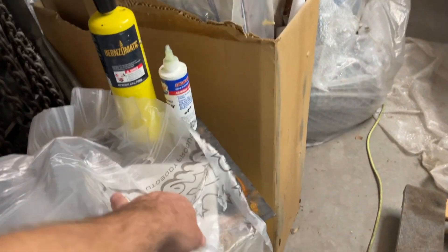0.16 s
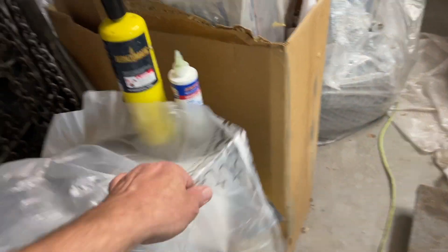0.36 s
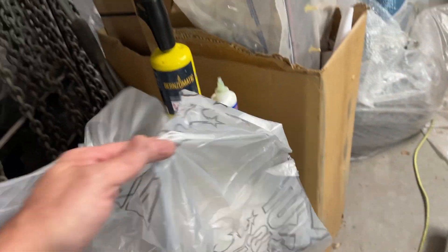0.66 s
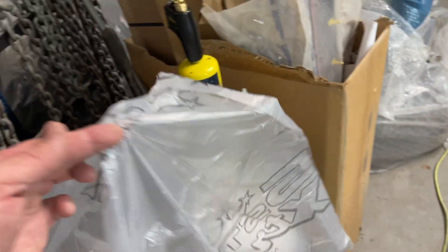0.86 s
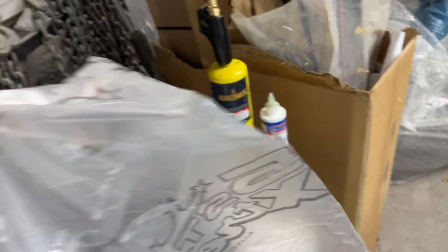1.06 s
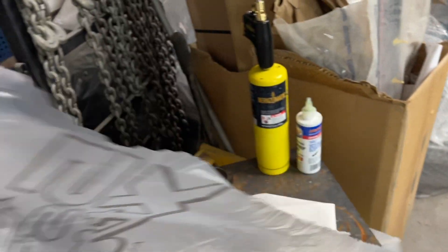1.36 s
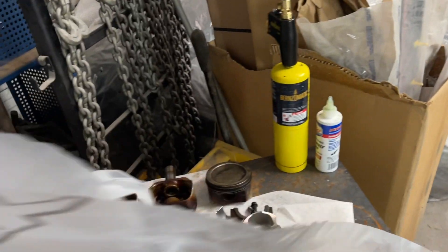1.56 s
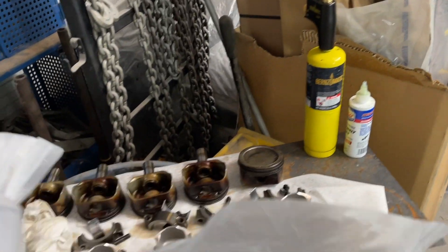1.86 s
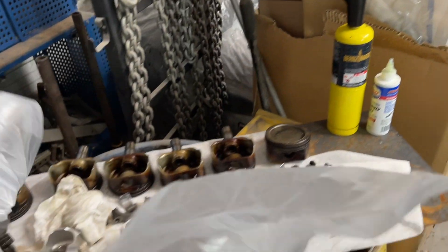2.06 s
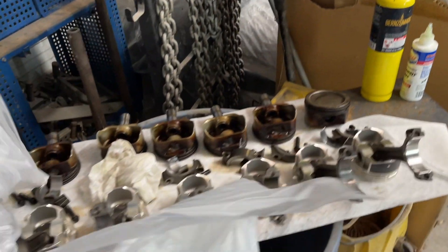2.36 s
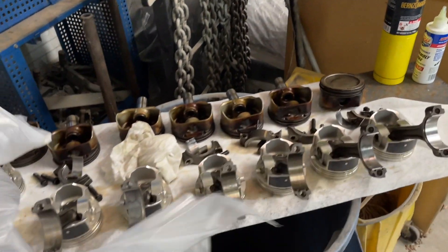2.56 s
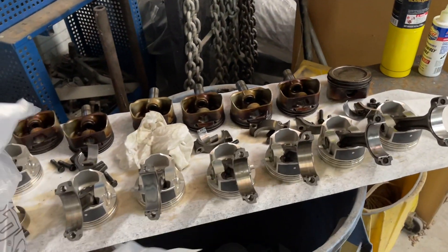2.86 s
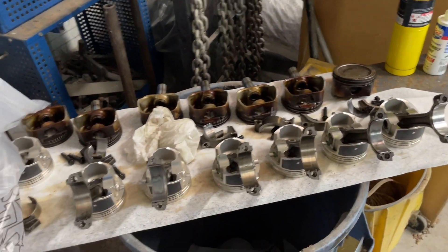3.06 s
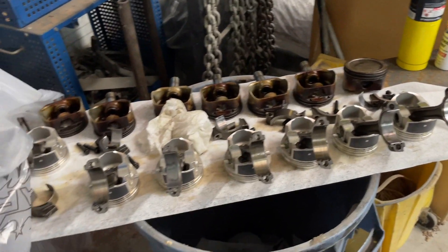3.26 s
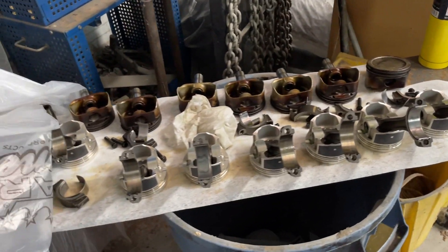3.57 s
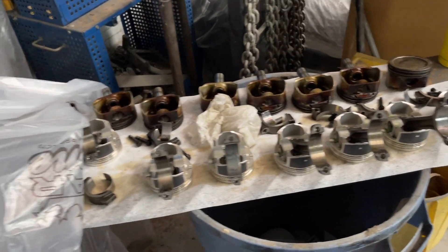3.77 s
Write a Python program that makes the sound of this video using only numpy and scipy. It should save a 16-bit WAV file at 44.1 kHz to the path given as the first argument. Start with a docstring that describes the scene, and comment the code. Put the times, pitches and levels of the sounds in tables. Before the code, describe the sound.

Thin plastic sheeting is dragged off a bench close to a phone microphone in a garage, crinkling brightly with sharp snaps; it thins out and a single hollow tap follows, over a faint distant idling engine.

```python
"""An engine idles some way off, a throbbing set of shaft orders over a low drone; then, close to a phone
in a garage, hands drag a thin plastic sheet off a bench. Countless tiny creases, random clicks, make a bright
hiss over a duller rustle. Big creases crack as short noise bursts with ringing facets, folds flop as
brief decaying notes, and near the end something taps a hollow panel whose modes ring.
The walls answer the cracks, flops and tap; two ports hear it all with some likeness, lead and tilt."""
import sys
import numpy as np
from scipy import signal
from scipy.fft import rfft, irfft, next_fast_len
from scipy.io import wavfile
from scipy.ndimage import uniform_filter1d, map_coordinates

SR = 44100
rng = np.random.default_rng(int(sys.argv[2]) if len(sys.argv) > 2 else 0)


def generate_wav(signal):
    """Clip the signal to [-1, 1] and save it as 16-bit WAV at the path in sys.argv[1]."""
    frames = np.transpose(np.atleast_2d(signal))
    scaled = np.clip(frames, -1, 1) * 32767
    pcm = np.round(scaled).astype(np.int16)
    wavfile.write(sys.argv[1], SR, pcm)


N = 171990

# Distant engine: (multiple of shaft rate, relative level [dB], phase scatter [cycles])
ENGINE_ORDERS = [(3, -55, 0.42), (4, -48.5, 0.47), (6, -59.5, 0.55), (8, -63.5, 0.09), (9, -53, 0.013),
                 (10, -53, .03), (11, -52, 0.024), (12, -61, 0.059), (13, -58.5, 0.28), (15, -57, 0.45)]
# Colour of the engine's low drone: (frequency [Hz], relative level [dB])
DRONE_COLOUR = [(13, -30), (22, -14), (48, 1), (91, 4), (138, 3), (216, -10.5), (251, -10), (413, -19.5),
                (468, -10.5), (600, -22.5), (780, -41), (1320, -120)]
# Pull on the sheet: (time [s], relative crackle level [dB],
# middle band over that [dB, relative], low band over that [dB, relative])
PULL = [(0.0, -87, 12, 6), (0.06, -83, 2, 1), (0.1, -49, -9, -3), (0.16, -44, -6, -6),
        (0.24, -49.5, -6.5, -8), (0.38, -35, -9.5, -9.5), (0.48, -34.5, -8.5, -11.5), (0.56, -31.5, -9, -8),
        (0.61, -35.5, -7, -10), (0.67, -30.5, -12, -11), (0.76, -38, -7, -10.5), (0.92, -36, -9.5, -10.5),
        (1.0, -41.5, -5.5, -7), (1.26, -38.5, -9, -12), (1.29, -42.5, -5.5, -9), (1.32, -40.5, -8.5, -11.5),
        (1.49, -36, -8, -8), (1.51, -34.5, -11, -8.5), (1.53, -35, -7.5, -8), (1.73, -42, -6.5, -7.5),
        (2.07, -37, -8, -8), (2.12, -42, -6, -10), (2.36, -42, -3.5, -10), (2.39, -37, -4.5, -11),
        (2.49, -38.5, -5, -12), (2.56, -41, -5.5, -6.5), (2.606, -43.5, -6.5, -11.5), (2.616, -38, -2, -10),
        (2.645, -40.5, -4, -5), (2.655, -40, -7, -10), (2.69, -45, 0, -10), (2.71, -38, -3, -8.5),
        (2.75, -42, -1.5, -3), (2.81, -44, -5, -8.5), (3.02, -45, -4.5, -10), (3.51, -41.5, -6, -11.5),
        (3.57, -42.5, -4, -6), (3.66, -46, -5.5, -12.5), (3.78, -47, -6, -8), (3.9, -46.5, -8, -9)]
# Wide folds moving: (time [s], relative level of the dull rustle [dB])
FOLDING = [(0.0, -64), (0.13, -60.5), (0.27, -60.5), (0.39, -49.5), (0.52, -44), (0.62, -48), (0.88, -53),
           (1.17, -57), (1.36, -55), (1.42, -54), (1.57, -49.5), (1.75, -56.5), (2.05, -56), (2.38, -56),
           (2.58, -54.5), (2.75, -52.5), (2.93, -59), (3.5, -59.5), (3.74, -62), (3.9, -66)]
# Colour of the creases' crackle: (frequency [Hz], relative level [dB])
CRACKLE_COLOUR = [(600, -19.5), (1500, -15.5), (2500, -14), (3100, -14), (3900, -12.5), (5500, -11),
                  (7200, -9.5), (9500, -4), (10800, -1), (11800, -7), (12700, -16.5), (14500, -25),
                  (16000, -47)]
# Colour of the wide folds' rustle: (frequency [Hz], relative level [dB])
RUSTLE_COLOUR = [(100, -46), (220, -5), (350, 0), (600, -3), (950, -2.5), (1400, -13), (2500, -13),
                 (5000, -35)]
# Edges between the crackle's three bands, upper then lower: (frequency [Hz])
BAND_EDGES = [6500, 3400]
# Big creases: (time [s], relative level [dB], spray against that level [dB],
# facet pitch [Hz], facet against that level [dB])
SNAPS = [(0.0918, -31, -12, 5000, -2), (0.1358, -28, -16, 5060, 4), (0.5484, -28, -14, 5000, -9),
         (0.66, -17, -14, 4500, -12), (1.1722, -29, -14, 5000, -9), (1.205, -26, -18, 5000, -11),
         (1.5053, -10.5, -8, 3220, -7.5), (1.513, -27, -10, 7500, -9), (1.518, -19, -10, 7500, -9),
         (2.611, -15, -10, 5250, -3), (2.619, -29, -12, 4530, -4), (2.6292, -20, -9, 5500, -4),
         (2.642, -25, -14, 5500, 1), (2.6974, -37, -16, 5000, -6), (2.7055, -15.5, -16, 5500, -5),
         (2.7105, -24, -17, 5500, -6), (2.7168, -18.5, -16, 5500, 3), (2.7302, -26, -13, 5100, 11),
         (3.78, -29, -11, 3820, 4)]
# Folds popping over: (time [s], relative level [dB], pitch [Hz])
FLOPS = [(0.347, -26, 1090), (0.37, -24, 970), (0.612, -24, 980), (0.73, -38, 420), (0.926, -26, 940),
         (1.087, -34, 945), (1.425, -36.5, 315), (1.502, -29, 790), (1.517, -36, 950), (1.585, -39, 600),
         (1.62, -34, 343), (1.645, -36, 342), (1.859, -34, 450), (2.148, -34.5, 230), (2.184, -36.5, 240),
         (2.206, -43, 277), (2.559, -36.5, 202), (2.562, -36, 700), (2.64, -24, 1880), (2.704, -44, 256),
         (2.721, -32, 244)]
# Hard first contact of the tap: (frequency [Hz], level against the thump [dB], t60 [s])
KNOCK_MODES = [(900, -5, .014), (1900, -18, .008), (2700, -24, .006)]
# Modes of the hollow panel: (frequency [Hz], level against the thump [dB], t60 [s])
PANEL_MODES = [(102.5, -17, 0.28), (159.6, -14.5, 0.26), (221, -23, 0.25), (290, -33, .2), (356, -23, 0.22),
               (410, -26, 0.18), (452.5, -19.5, 0.14), (602, -28, 0.1), (704, -21, .07), (845, -22, 0.076),
               (1220, -25.5, 0.08)]
# Decay of the garage: (frequency [Hz], t60 [s])
GARAGE_DECAY = [(200, 0.19), (2000, 0.066), (10000, 0.12)]
# Likeness of the two ports: (frequency [Hz], left-right likeness [0 to 1])
PORT_LIKENESS = [(30, .98), (60, .96), (130, .86), (300, .8), (900, .75), (1600, .1), (2200, .62),
                 (3500, .35), (4300, .5), (5000, .25), (6200, .62), (7000, .35), (8400, .99), (9200, .82),
                 (10000, .995), (10600, .995), (11400, .84), (12000, .99), (12900, .9), (13300, .999)]
# Phase by which the right port leads: (frequency [Hz], lead [rad])
PORT_LEAD = [(100, 0), (400, -.4), (1300, -.8), (2200, -.1), (3000, -1.3), (4200, -.5), (6500, -.25),
             (7500, -.95), (8300, 0), (8900, .2), (11700, 6.2), (12800, 6.6), (13300, 9.42), (14400, 9.42),
             (14900, 12.5)]
# Level of the left port over the right: (frequency [Hz], tilt [dB])
PORT_TILT = [(300, 0), (900, 1.5), (2000, .8), (4000, 0), (7000, 1.5), (8500, 0)]

SHAFT_HZ, SHAFT_WAVER, FIRST_BEAT_S = 13.7, .002, .012  # waver as a fraction of the rate
DRONE_DB = -49.5
CREASES_PER_S, CREASE_SPREAD_DB = 16000, 2
PATCHY_DB = 1.5
SPURTS_PER_S, SPURT_SPREAD_DB = 160, 2.2
SPURT_DB, SPURT_T60_S = -18.5, 0.036  # least spurt, over the steady crackle
SNAP_RISE_S, SPRAY_T60_S = 0.00044, 0.047
FACET_CYCLES, FLOP_CYCLES = 30, 14  # cycles to fall by 60 dB
TAP_S, TAP_DB = 3.5587, -13.5
TAP_START_HZ, TAP_END_HZ, TAP_FALL_S = 730, 250, .0014
TAP_RISE_S, TAP_T60_S = 0.0015, 0.03
WET_DB = -13
TOP_HZ = 15850


def amp(db):
    """Amplitude factor for a level in dB."""
    return 10 ** (np.asarray(db) / 20)


def unit(x):
    """Scale to rms 1."""
    return x / np.sqrt(np.mean(x ** 2) + 1e-20)


def along(points, hz):
    """Read (Hz, value) points on a log frequency axis."""
    f, v = np.transpose(points)
    return np.interp(np.log(hz + 1), np.log(f + 1), v)


def curves(rows):
    """One value per sample for each column after the time."""
    s, *cols = np.transpose(rows)
    return [np.interp(np.arange(N) / SR, s, c) for c in cols]


def wobble(rate):
    """A smooth random curve, rate knots a second."""
    knots = rng.standard_normal(int(N * rate / SR) + 4)
    return map_coordinates(knots, [np.arange(N) * rate / SR])


def filtered(x, response):
    """Multiply the spectrum by a complex response of frequency."""
    m = next_fast_len(N + SR // 2)
    return irfft(rfft(x, m) * response(np.fft.rfftfreq(m, 1 / SR)), m)[..., :N]


def coloured(x, spectrum):
    """Shape the spectrum by a table of levels."""
    return filtered(x, lambda hz: amp(along(spectrum, hz)))


def add(track, s, sound):
    """Lay a sound into the track at s seconds."""
    part = track[round(s * SR):][:len(sound)]
    part += sound[:len(part)]


def engine():
    """Shaft orders, the middle ones nearly in step so that they throb once a turn, over a low drone."""
    rate = SHAFT_HZ * (1 + SHAFT_WAVER * wobble(3.18))
    turns = np.cumsum(rate) / SR - SHAFT_HZ * FIRST_BEAT_S
    quarter_turn_apart = np.c_[[0, .25]]  # phase in cycles for the shared and unshared parts
    lines = np.zeros((2, N))
    for k, db, scatter in ENGINE_ORDERS:
        level = amp(db + 1.0 + 2.1 * wobble(4.02))
        cycles = k * turns + scatter * rng.normal() + quarter_turn_apart
        lines += level * np.sin(2 * np.pi * cycles)
    drone = coloured(rng.standard_normal((2, N)), DRONE_COLOUR)
    return amp(DRONE_DB) * unit(drone) + lines * [[1], [.8]]


def creases(per_s, spread_db):
    """Tiny creases snap at random moments as clicks of scattered size; rms 1."""
    hit = rng.random(N) < per_s / SR
    size = amp(spread_db * rng.standard_normal(N)) * rng.standard_normal(N)
    return unit(hit * size)


def spurts():
    """Gain on crackle and rustle: random folds let go at once and settle more slowly."""
    t = np.arange(SR // 20) / SR
    excess = np.minimum(rng.exponential(size=N), 3)
    hit = (rng.random(N) < SPURTS_PER_S / SR) * amp(SPURT_DB + SPURT_SPREAD_DB * excess)
    return unit(1 + signal.fftconvolve(hit, amp(-60 * t / SPURT_T60_S))[:N])


def patchy(x, depth_db):
    """Random gain patches that drift in time and pitch, as the sheet changes shape."""
    z = signal.stft(x, nperseg=512)[2]
    field = uniform_filter1d(rng.standard_normal(z.shape), size=6, axis=0)  # across pitch
    field = uniform_filter1d(field, size=12, axis=1)  # across time
    return signal.istft(z * amp(depth_db * unit(field)), nperseg=512)[1][:N]


def sheet(gain):
    """The pull sets the bright crackle and its colour; wide folds give a duller rustle."""
    crackle_db, middle_db, low_db = curves(PULL)
    clicks = gain * creases(CREASES_PER_S, CREASE_SPREAD_DB)
    crackle = patchy(coloured(clicks, CRACKLE_COLOUR), PATCHY_DB)
    below, low = filtered(crackle, lambda hz: 1 / (1 + (hz / np.c_[BAND_EDGES]) ** 6))
    bright = unit(crackle - below) * amp(1.0)
    bright += unit(below - low) * amp(middle_db + 0.5)
    bright += unit(low) * amp(low_db + 1.13)
    dull = patchy(coloured(gain * creases(2500, 3.0), RUSTLE_COLOUR), PATCHY_DB)
    return bright * amp(crackle_db) + unit(dull) * amp(curves(FOLDING)[0] + 2.0)


def snaps():
    """Each big crease is a millisecond-scale burst with a short spray; the flat facet beside it rings briefly."""
    bursts, facets, t = np.zeros(N), np.zeros(N), np.arange(SR // 20) / SR
    u = t / SNAP_RISE_S
    for s, db, spray_db, hz, facet_db in SNAPS:
        crack = (u / 2 * np.exp(1 - u / 2)) ** 2
        spray = amp(spray_db - 60 * t / SPRAY_T60_S) * (1 - np.exp(-u))
        add(bursts, s, amp(db - 1.0) * (crack + spray) * rng.choice([-1, 1], len(t)))
        decay = amp(db + facet_db - 60 * t * hz / FACET_CYCLES)
        add(facets, s, decay * (1 - np.exp(-u / 2)) * np.sin(2 * np.pi * hz * t))
    return coloured(bursts, CRACKLE_COLOUR) + facets


def flops():
    """A wide fold pops over with a dull note of a few cycles."""
    out, t = np.zeros(N), np.arange(SR // 10) / SR
    rise = 1 - np.exp(-t / 0.00096)
    for s, db, hz in FLOPS:
        decay = amp(db - 2.0 - 60 * t * hz / FLOP_CYCLES)
        add(out, s, decay * rise * np.sin(2 * np.pi * hz * t))
    return out


def modes(table, t, rise_per_cycle):
    """Sum of decaying sines, each building up in proportion to its pitch."""
    return sum(amp(db - 60 * t / t60) * (1 - np.exp(-t * hz * rise_per_cycle)) * np.sin(2 * np.pi * hz * t)
               for hz, db, t60 in table)


def tap():
    """A hard knock, a thump of falling pitch, and the panel's modes ringing behind them."""
    out, t = np.zeros(N), np.arange(SR // 2) / SR
    fall = (TAP_START_HZ - TAP_END_HZ) * TAP_FALL_S * (1 - np.exp(-t / TAP_FALL_S))
    turns = TAP_END_HZ * t + fall
    thump = amp(-60 * t / TAP_T60_S) * (1 - np.exp(-t / TAP_RISE_S)) * np.sin(2 * np.pi * turns)
    knock = -modes(KNOCK_MODES, t, 2)  # opposite polarity to the thump
    ring = modes(PANEL_MODES, t, 0.5)
    add(out, TAP_S, amp(TAP_DB) * (thump + knock + ring))
    return out


def garage(x):
    """Two unrelated answers of the walls; each frequency dies at its own speed."""
    hz, t, z = signal.stft(rng.standard_normal((2, SR // 3)), SR, nperseg=256)
    decay = amp(-60 * t / along(GARAGE_DECAY, hz)[:, None])
    tail = signal.istft(z * decay, SR, nperseg=256)[1]
    return signal.fftconvolve(x[None], tail / np.linalg.norm(tail[0]), axes=1)[:, :N]


def ports(pair):
    """Two microphone ports hear a shared and an unshared part, with a phase lead and a tilt between them."""
    def share(hz):
        angle = np.arccos(np.clip(along(PORT_LIKENESS, hz), -1, 1)) / 2
        return np.array([np.cos(angle), np.sin(angle)])

    def left_and_right(hz):
        half = amp(along(PORT_TILT, hz) / 2) * np.exp(-.5j * along(PORT_LEAD, hz))
        return np.array([half, 1 / half])

    mid, side = filtered(pair, share)
    return filtered(np.array([mid + side, mid - side]), left_and_right)


def scene():
    """Sheet close by, engine far off, and the walls answering the cracks, flops and tap."""
    near, gain = snaps() + flops() + tap(), spurts()
    direct = np.array([sheet(gain) + near, sheet(gain)])  # shared part, unshared part
    return ports(direct + amp(WET_DB) * garage(near) + engine())


def record(dry):
    """Nothing passes at or above the band limit."""
    return filtered(dry, lambda hz: hz < TOP_HZ)


dry = scene()
out = record(dry)
generate_wav(out)
```